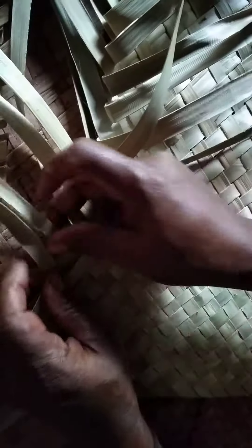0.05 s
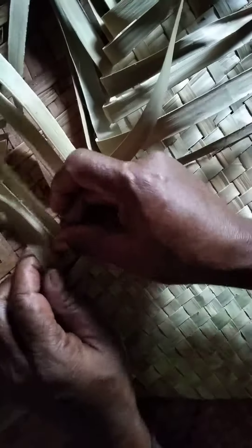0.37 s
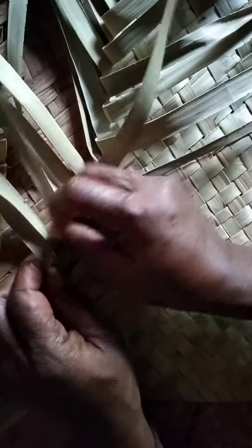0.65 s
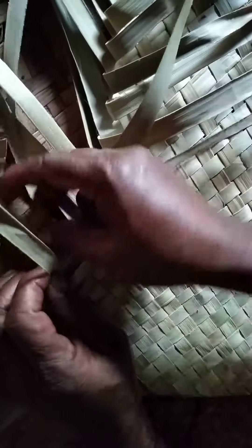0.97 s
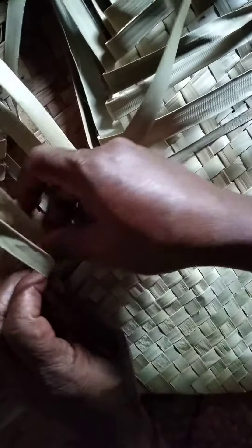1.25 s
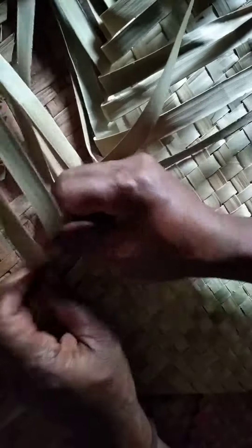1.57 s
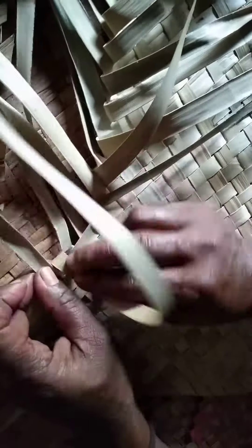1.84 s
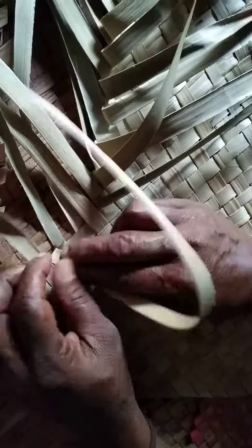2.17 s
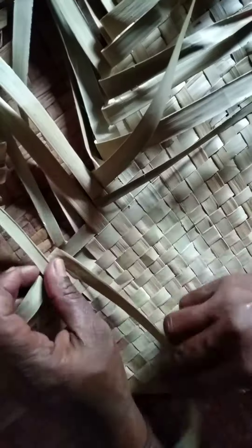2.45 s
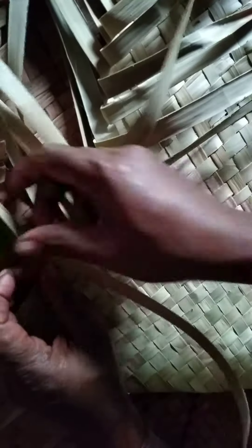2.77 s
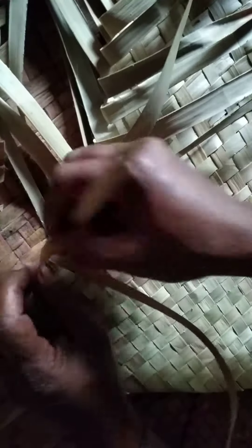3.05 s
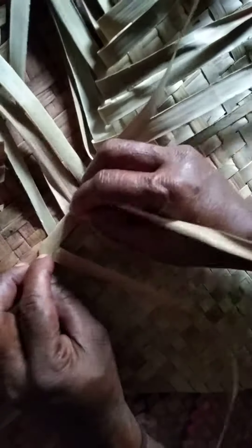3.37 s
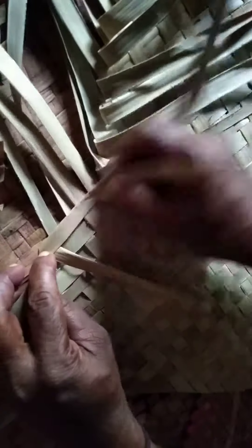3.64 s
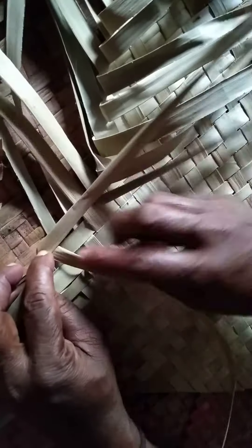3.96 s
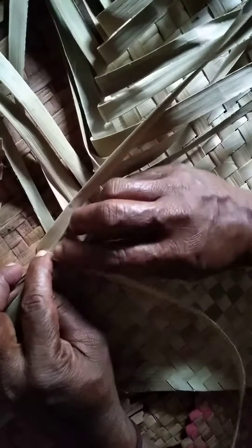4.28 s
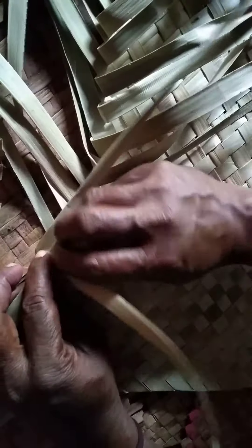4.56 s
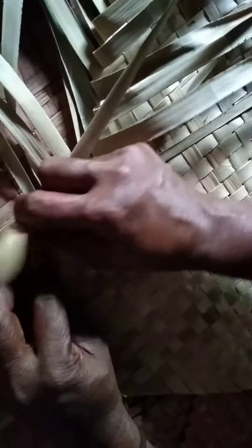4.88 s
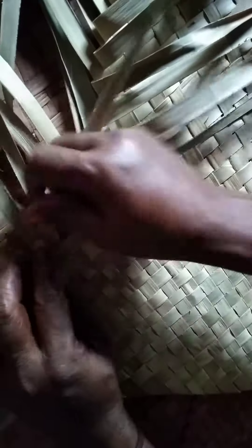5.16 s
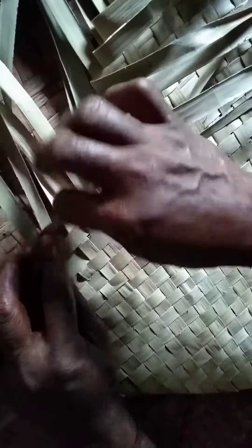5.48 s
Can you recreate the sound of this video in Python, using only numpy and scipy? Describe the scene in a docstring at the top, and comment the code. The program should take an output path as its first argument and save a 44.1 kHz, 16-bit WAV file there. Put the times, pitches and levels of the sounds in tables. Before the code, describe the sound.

Hands plait dry palm-leaf strips on a woven mat, close to the microphone in a quiet open shelter. The strips slide over each other in short, bright rasps, with tiny ticks, sharp snaps of stiff fibre and soft bumps of fingers on the mat. Later a hand knocks twice against a strip. Behind it are low rumbling air, thin insect hiss and a small bird's distant chirps, and near the end a faint rooster holds one note.

```python
"""Hands plait dry palm-leaf strips on a woven mat, close by, in a quiet open shelter.
From the start, over rumbling air and far insects, the strips catch and slip on each other with a bright
rasp and tiny ticks, and fingers bump the mat. Soon stiff fibres snap as the strips are folded, edges
scuff the mat, and a strip squeaks in the grip. From about 1.7 s a small bird chirps far off. Around 3.9 s
a hand knocks twice against a strip. Near the end a distant rooster holds one long note."""
import sys
import numpy as np
from scipy import signal
from scipy.fft import rfft, irfft
from scipy.io import wavfile

SR = 44100
rng = np.random.default_rng(int(sys.argv[2]) if len(sys.argv) > 2 else 0)


def master_out(mix):
    """Clip the mix to full scale and print it as 16-bit PCM to the path in sys.argv[1]."""
    frames = np.transpose(np.atleast_2d(mix))
    ceiling = np.clip(frames, -1, 1)
    pcm = np.round(ceiling * 32767).astype(np.int16)
    wavfile.write(sys.argv[1], SR, pcm)


N = 252252
TIME = np.arange(N) / SR

# tone of the rumbling air and of the soft hiss: (frequency [Hz], relative level [dB])
AIR_SPECTRUM = [(20, 4), (35, 4.5), (55, -2.5), (100, -9), (160, -16), (255, -18), (450, -27.5),
                (800, -25.5), (1200, -31.5), (2500, -31.5), (5000, -37.5), (9000, -67), (16000, -51)]
HISS_SPECTRUM = [(3000, -13), (7000, 0.5), (9800, -14), (13000, 8), (16000, -3)]
# a hand draws one strip over another: (start [s], length [s], rasp level [dB], papery body level [dB])
STROKES = [(0.0, 0.046, -39.5, -53.5), (0.064, 0.094, -50, -54.5), (0.165, 0.081, -45, -54.5),
           (0.255, 0.029, -49, -55.5), (0.356, 0.11, -50.5, -58), (0.476, 0.14, -46, -55),
           (0.637, 0.096, -41.5, -49.5), (0.806, 0.18, -40.5, -48.5), (0.938, 0.26, -45, -53),
           (1.079, 0.17, -43, -51), (1.265, 0.18, -41.5, -51.5), (1.512, 0.13, -50.5, -60),
           (1.608, 0.18, -42.5, -52.5), (1.778, 0.069, -40.5, -50), (1.839, 0.11, -43, -51.5),
           (2.101, .03, -45, -49), (2.122, 0.039, -34.5, -43), (2.203, 0.084, -31.5, -47.5),
           (2.249, .16, -25.5, -45), (2.445, 0.087, -44, -55.5), (2.77, 0.068, -45, -54),
           (2.853, 0.15, -45, -53.5), (2.976, 0.2, -40.5, -61), (3.234, 0.055, -41, -54),
           (3.312, 0.11, -46.5, -54.5), (3.406, 0.25, -45.5, -54), (3.555, 0.087, -40, -51),
           (3.602, 0.098, -28, -44), (3.693, 0.082, -35, -42), (3.861, 0.027, -45, -76),
           (3.882, 0.27, -48.5, -55.5), (4.367, 0.29, -53, -58.5), (4.624, .085, -46, -56.5),
           (4.697, 0.11, -56, -58.5), (4.907, 0.038, -43, -49.5), (4.959, 0.12, -40, -50),
           (5.105, 0.15, -43.5, -54.5), (5.22, 0.11, -46, -60.5), (5.342, 0.15, -44, -58),
           (5.555, 0.076, -38, -63), (5.641, .09, -44.5, -55)]
# tone of the fine rasp and of the strip's papery body: (frequency [Hz], relative level [dB])
RASP_SPECTRUM = [(2000, -46.5), (6000, -23.5), (8500, -14), (10500, -5), (12500, 4), (14000, 0.5),
                 (15800, -10.5)]
BODY_SPECTRUM = [(200, 2.5), (500, -12), (800, -1.5), (1400, -0.5), (2200, -1), (4000, 1), (6500, -2.5),
                 (9000, -0.5), (14000, 0)]
# fingers bump the mat: (time [s], level [dB], pitch [Hz], time to fade by 60 dB [s])
BUMPS = [(.0, -38, 96, 0.25), (0.189, -46.5, 103, 0.23), (1.571, -39, 36.3, 0.24),
         (2.344, -42.5, 139, 0.25), (2.479, -47, 51.3, 0.32), (2.731, -52, 110, 0.11),
         (3.33, -48.5, 41.4, 0.53), (3.902, -49, 158, 0.062), (3.942, -46, 148, 0.056),
         (4.407, -49, 315, 0.035)]
# stiff fibres snap, or a hand knocks against a strip (at 3.907 and 3.94 s):
# (time [s], level [dB], tick pitch [Hz], low knock [dB], middle crack [dB], ring of the leaf's rib [dB])
# the last three columns are added to the row's level
SNAPS_AND_KNOCKS = [(0.4843, -25, 13800, -36, -35, -41), (0.541, -18.5, 12100, -40, -46, -28),
                    (0.615, -32, 13000, -31, -20, -20), (0.697, -21.5, 13000, -44, -37, -30),
                    (0.8265, -28, 12700, -38, -23, -33), (0.8817, -21, 12800, -36, -37, -27),
                    (0.9205, -21, 13100, -35, -36, -22), (1.0901, -11, 11650, -33, -41, -23),
                    (1.1161, -24.5, 12400, -32, -13, -15), (1.1295, -24, 13500, -30, -18.5, -17),
                    (1.2273, -24.5, 13000, -35, -34, -20), (1.504, -25, 12900, -45, -26, -22.5),
                    (1.7546, -32.5, 12200, -46, -36, -7.5), (1.97, -26.5, 13600, -31, -31, -15),
                    (1.9782, -20.5, 12900, -32.5, -28, -18), (2.52, -22, 12900, -53, -27, -23.5),
                    (2.614, -27, 12100, -51, -29, -22), (2.7582, -30, 12500, -38, -42, -18),
                    (2.766, -15.5, 13600, -44, -37, -32), (3.0884, -18.5, 12400, -37, -38, -33),
                    (3.1581, -18, 12400, -45, -52, -44), (3.253, -32, 11400, -35, -35, -32),
                    (3.7675, -18.5, 10200, -49, -27, -17), (3.7802, -18.5, 12300, -29.5, -23, -21),
                    (3.907, -44.5, 12000, -0.5, -16, -21), (3.9401, -35, 12000, -9.5, -17, -17),
                    (4.1707, -19.5, 13400, -37, -23, -19), (4.4032, -8, 11630, -22.5, -21.5, -22),
                    (4.456, -22, 12300, -42, -28, -20.5), (4.583, -27.5, 12800, -35, -40, -24),
                    (4.64, -25.5, 14200, -24, -34, -32), (4.9044, -7.5, 13100, -32.5, -24, -21.5),
                    (5.0469, -19.5, 12500, -51, -40, -31), (5.158, -23, 12800, -33, -23, -32),
                    (5.69, -20, 11340, -45, -27, -17.5)]
# the ways a strip rings, low to high: (pitch [Hz], width of the band [Hz], relative level [dB])
KNOCK_MODES = [(780, 96, 8), (1244, 310, 16.5)]
CRACK_MODES = [(2050, 195, -2), (2850, 270, -2)]
RIB_MODES = [(4120, 730, 4), (4800, 3000, -1), (7440, 1350, 0)]
TICK_MODES = [(8300, 980, -8), (10500, 1770, 0.5), (12080, 1100, 9.5), (14700, 3800, -1.5)]
# an edge drags on the mat: (middle time [s], half length [s], rasp level [dB], dull scrape level [dB])
SCUFFS = [(0.888, 0.0083, -28.5, -46), (1.624, 0.011, -37, -50.5), (1.703, 0.0097, -35, -68),
          (2.151, 0.01, -32.5, -62), (2.399, 0.019, -34, -46.5), (2.976, 0.0038, -33.5, -60),
          (3.095, 0.0042, -33, -56), (3.667, 0.012, -32, -38), (3.959, 0.007, -40, -43),
          (4.677, 0.012, -37.5, -48.5), (5.007, 0.0052, -30.5, -45.5), (5.188, 0.0085, -33, -40),
          (5.489, .004, -36.5, -57)]
# tone of that dull scrape: (frequency [Hz], relative level [dB])
SCRAPE_SPECTRUM = [(200, -12), (450, -10), (750, -1.5), (1400, -5.5), (2200, -1), (3500, -4.5), (7000, -2),
                   (12000, -7)]
# a strip squeaks in the grip: (time [s], pitch [Hz], level [dB])
SQUEAKS = [(1.358, 1690, -47), (2.419, 2130, -41.5)]
# bird calls: (time [s], length [s], pitch [Hz], level [dB], upper voice against the lower [dB])
CHIRPS = [(1.652, .045, 3250, -57, -8), (2.161, 0.054, 2850, -65, 3), (2.792, 0.04, 2816, -50.5, -10),
          (3.427, .045, 2900, -49.5, -14), (4.309, 0.042, 3320, -61, -9), (5.404, 0.028, 2565, -60, -15)]
# the course of the rooster's note: (time [s], pitch [Hz], level [dB])
CROW = [(5.10, 768, -80), (5.26, 764, -62.5), (5.35, 791, -79), (5.43, 788, -66), (5.61, 789, -67.5),
        (5.72, 783, -64)]
# its tones at 1, 2 and 3 times the pitch: (relative level [dB])
CROW_HARMONICS_DB = [4.5, -3, -14]


def from_db(db):
    """Turn decibels into a number to multiply by."""
    return 10 ** (np.asarray(db) / 20)


def rms_one(x):
    """Scale a signal so its average strength (rms) is 1."""
    return x / np.sqrt(np.mean(x ** 2) + 1e-20)


def add(out, start, sound):
    """Mix a sound in at a start time in seconds."""
    i = max(round(start * SR), 0)
    out[i:i + len(sound)] += sound[:max(N - i, 0)]


def drift(per_s):
    """A smooth random wobble of strength 1, with up to about per_s swings a second."""
    hz = np.fft.rfftfreq(N, 1 / SR)
    return rms_one(irfft(rfft(rng.standard_normal(N)) / (1 + (hz / per_s) ** 4), N))


def coloured(x, spectrum):
    """Shape a signal's tone by a spectrum table, fading beyond its ends; strength 1."""
    hz, db = np.transpose(spectrum)
    f = np.fft.rfftfreq(N, 1 / SR) + 1
    gain = from_db(np.interp(np.log(f), np.log(hz), db))
    end_cuts = np.hypot(1, (hz[0] / f / 2) ** 2) * np.hypot(1, (f / hz[-1] / 2) ** 2)
    return rms_one(irfft(rfft(x) * gain / end_cuts, N))


def resonate(x, hz, width):
    """Make a signal ring at one pitch; a narrower width in Hz rings longer."""
    r = np.exp(-np.pi * width / SR)
    feedback = [1, -2 * r * np.cos(2 * np.pi * hz / SR), r * r]
    return signal.lfilter(np.array([1, 0, -1]) * (1 - r * r) / 2, feedback, x + 1e-18)


def echoes(x, t60, delay):
    """A blur of echoes that starts after delay seconds and fades by 60 dB in t60 seconds."""
    t = TIME[:SR]
    response = rng.standard_normal(SR) * from_db(-60 * t / t60) * (t > delay)
    return signal.fftconvolve(x, response / np.linalg.norm(response))[:N]


def surroundings(air_db=-50.5, hiss_db=-61.5, insect_db=-68, insect_hz=9600, width_hz=890):
    """A low rumble of air, a soft hiss and the thin, high sound of far insects."""
    air, hiss, insects = rng.standard_normal((3, N))
    air = from_db(air_db) * coloured(air, AIR_SPECTRUM)
    hiss = from_db(hiss_db) * coloured(hiss, HISS_SPECTRUM)
    insects = resonate(resonate(insects, insect_hz, width_hz), insect_hz, width_hz)
    return air + hiss + from_db(insect_db) * rms_one(insects)


def strokes(attack_share=0.11, arch_db=5.5, fade_t60=0.21, rest_rasp_db=-58, rest_body_db=-73.5):
    """Strength of rasp and body over time: each pull speeds up, is fastest midway and dies away."""
    rasp_power = np.full(N, from_db(rest_rasp_db) ** 2)  # held strips never lie quite still
    body_power = np.full(N, from_db(rest_body_db) ** 2)
    t = TIME[:SR // 2]
    for start, length, rasp_db, body_db in STROKES:
        rise = np.minimum(t / (attack_share * length), 1)
        off_middle = 2 * np.minimum(t / length, 1) - 1
        fade_db = 60 * np.maximum(t - length, 0) / fade_t60
        speed = rise * from_db(-arch_db * off_middle ** 2 - fade_db)
        add(rasp_power, start, (from_db(rasp_db) * speed) ** 2)
        add(body_power, start, (from_db(body_db) * speed) ** 2)
    return np.sqrt(rasp_power), np.sqrt(body_power)


def slips(per_s, spread_db):
    """A leaf sticks and lets go in tiny random jolts, a few stronger than the rest."""
    sizes = from_db(spread_db * np.minimum(rng.exponential(1, N), 5))
    return rms_one((rng.random(N) < per_s / SR) * sizes * rng.choice([-1, 1], N))


def friction(fast_share, grip, flutter):
    """A fast pull runs its slips together; a slow one catches, so single fibres are heard."""
    smooth = slips(per_s=16000, spread_db=0.5)
    catching = rms_one(grip * slips(per_s=2600, spread_db=2.5))
    return flutter * (np.sqrt(fast_share) * smooth + np.sqrt(1 - fast_share) * catching)


def sliding(rasp, body, unsteady_db=1.38):
    """Ribbed leaf rubs on leaf: slips hiss and shake the strip. At times an edge scuffs the mat."""
    hand = from_db(unsteady_db * drift(per_s=59))
    rasp, body, scrape = rasp * hand, body * hand, 0
    for middle, half_length, rasp_db, scrape_db in SCUFFS:
        swell = np.exp(-0.5 * ((TIME - middle) / half_length) ** 2)
        rasp = np.hypot(rasp, from_db(rasp_db) * swell)
        scrape = np.hypot(scrape, from_db(scrape_db) * swell)
    fast_share = np.clip(rasp / from_db(-35.5), 0.25, 0.92)
    grip = from_db(2.7 * drift(per_s=52))
    flutter = from_db(1.5 * drift(per_s=200))
    surface = friction(fast_share, grip, flutter)
    edge = friction(fast_share, grip, flutter)
    return (rasp * coloured(surface, RASP_SPECTRUM)
            + body * coloured(surface + edge, BODY_SPECTRUM)
            + scrape * coloured(edge, SCRAPE_SPECTRUM))


def crinkle(rasp, most_per_s=60, boost_db=12, spread_db=3.5, ring_db=-12, width_hz=2200):
    """Single fibres flick free, more often as the strips move; each ticks and faintly rings the strip."""
    motion = np.minimum(rasp, from_db(-40))
    strength = motion * from_db(boost_db + spread_db * rng.standard_normal(N).clip(-2, 1.8))
    chance = most_per_s / SR * np.sqrt(motion / motion.max())
    flicks = (rng.random(N) < chance) * strength
    pitches_hz = np.geomspace(9500, 15000, num=6)
    chosen = rng.integers(len(pitches_hz), size=N)
    ticks = sum(resonate(flicks * (chosen == k), hz, width_hz) for k, hz in enumerate(pitches_hz))
    ring = sum(from_db(db + ring_db) * resonate(flicks * rng.standard_normal(N), hz, width)
               for hz, width, db in CRACK_MODES + RIB_MODES)
    return (ticks + ring) * SR / (2 * np.pi * width_hz)


def bumps():
    """Fingers push softly on the mat, giving dull thuds that soon die away."""
    out, t = np.zeros(N), TIME[:SR // 2]
    for start, db, hz, t60 in BUMPS:
        rise = 1 - np.exp(-t * hz / 2)
        push = rng.standard_normal(len(t)) * from_db(-60 * t / t60) * rise
        thud = resonate(resonate(push, hz, 0.2 * hz), hz, 1.44 * hz)
        add(out, start, from_db(db) * thud / np.abs(thud).max())
    return out


def crackle(t, db, t60, density):
    """A fading spray of tiny clicks; density is the share of samples that click."""
    return from_db(db - 60 * t / t60) * rng.standard_normal(len(t)) * (rng.random(len(t)) < density)


def strip_ring(force, modes, pitch_ratio):
    """A jolt rings the strip at several pitches, with the energy of one millisecond at strength 1."""
    ring = sum((-1) ** k * from_db(db) * resonate(force, hz * pitch_ratio, width)
               for k, (hz, width, db) in enumerate(modes))
    return ring / np.sqrt(np.sum(ring ** 2) / (SR / 1000))


def snaps_and_knocks(knock_db=4.5, crack_db=-0.5, rib_db=1.5, tick_db=-5.5, base_tick_hz=12450):
    """A fibre snaps or a hand knocks against a strip; the strip bends, rings and settles, crackling."""
    out, t = np.zeros(N), TIME[:SR // 20]
    for start, db, tick_hz, knock, crack, rib in SNAPS_AND_KNOCKS:
        jolt = t == 0
        burst = crackle(t, db=-10, t60=0.016, density=0.3)  # in a snap, nearby fibres tear
        settle = crackle(t, db=-18, t60=0.059, density=0.03)
        push = jolt + 0.45 * burst
        pitch_ratio = np.exp(0.015 * rng.standard_normal())  # a stiffer strip rings higher
        groups = [(KNOCK_MODES, knock + knock_db), (CRACK_MODES, crack + crack_db),
                  (RIB_MODES, rib + rib_db)]
        bend = sum(from_db(level) * strip_ring(push, modes, pitch_ratio) for modes, level in groups)
        tick = from_db(tick_db) * strip_ring(jolt + burst + settle, TICK_MODES, tick_hz / base_tick_hz)
        add(out, start + 0.0011, from_db(db) * (tick + bend))
    return out


def squeaks(half_length_s=0.0052, roughness=0.0603):
    """For a few milliseconds the slips fall in step with one ringing pitch of the strip."""
    out = np.zeros(N)
    waver = 1 + roughness * drift(per_s=440)
    for middle, hz, db in SQUEAKS:
        swell = from_db(db - 4.3 * ((TIME - middle) / half_length_s) ** 2)
        out += swell * np.sin(2 * np.pi * hz * np.cumsum(waver) / SR)
    return out


def bird(roughness=0.033, sag_hz_per_s=3720, upper_ratio=1.4, blip_s=0.018, blip_ratio=0.85, blip_db=-5):
    """Hoarse calls in two voices, each a falling note then a lower blip, echoing from the trees."""
    calls, t = np.zeros(N), TIME[:SR // 10]
    waver = 1 + roughness * drift(per_s=317)
    for time, length, hz, db, upper_db in CHIRPS:
        note = (time, length, hz, db)
        blip = (time + length, blip_s, hz * blip_ratio, db + blip_db)
        for start, span, start_hz, level in (note, blip):
            progress = np.minimum(t / span, 1)
            swell = np.sqrt(8 * progress * (1 - progress))
            pitch = (start_hz - sag_hz_per_s * t) * np.interp(start + t, TIME, waver)
            phase = 2 * np.pi * np.cumsum(pitch) / SR
            voices = np.sin(phase) + from_db(upper_db) * np.sin(upper_ratio * phase)
            add(calls, start, from_db(level) * swell * voices)
    calls *= from_db(3 * drift(per_s=120))  # the loudness flickers
    return from_db(-1) * calls + from_db(-4.5) * echoes(calls, t60=0.8, delay=0.02)


def rooster():
    """A far, harsh and shaky held note, with its echoes a little louder than the note itself."""
    times, hz, db = np.transpose(CROW)
    shake = 0.048 * drift(per_s=60) + 0.014 * drift(per_s=16)
    pitch = np.interp(TIME, times, hz) * (1 + shake)
    phase = 2 * np.pi * np.cumsum(pitch) / SR
    note = sum(from_db(level) * np.sin(k * phase) for k, level in enumerate(CROW_HARMONICS_DB, 1))
    note *= from_db(np.interp(TIME, times, db)) * (TIME > times[0])
    return from_db(-2) * note + from_db(-1) * echoes(note, t60=0.47, delay=0.0057)


def scene():
    """Mix the leaves, their faint echoes, the bumps, the animals and the air into one channel."""
    rasp, body = strokes()
    leaves = sliding(rasp, body) + crinkle(rasp) + snaps_and_knocks() + squeaks()
    near = leaves + from_db(-15) * echoes(leaves, t60=0.069, delay=0.0026) + bumps()
    return (near + bird() + rooster() + surroundings())[None]


def record(dry):
    """Cut away the very highest treble steeply."""
    cutoff_hz = 15950
    return signal.sosfilt(signal.ellip(10, 0.2, 70, cutoff_hz, fs=SR, output="sos"), dry)


dry = scene()
out = record(dry)
master_out(out)
```